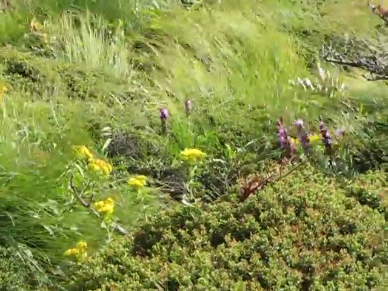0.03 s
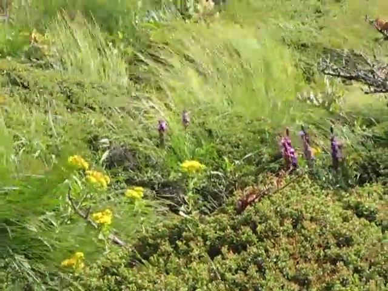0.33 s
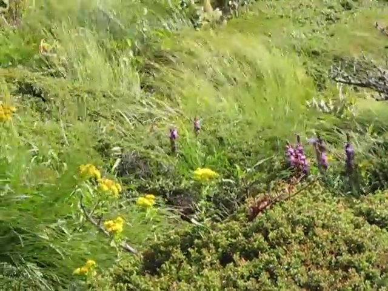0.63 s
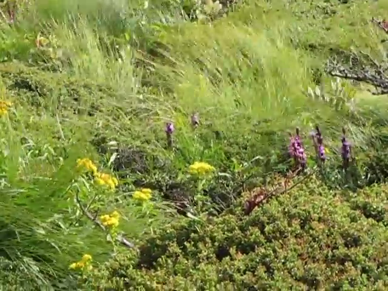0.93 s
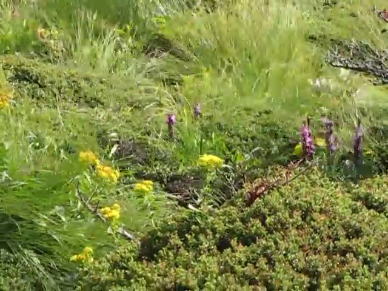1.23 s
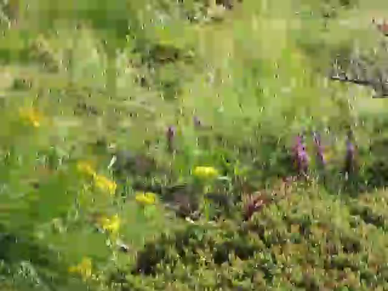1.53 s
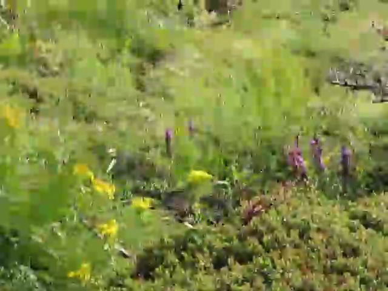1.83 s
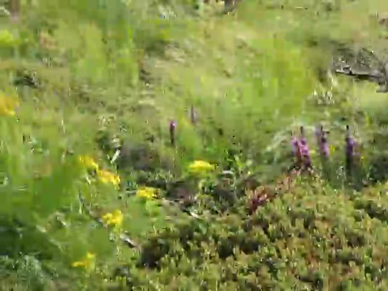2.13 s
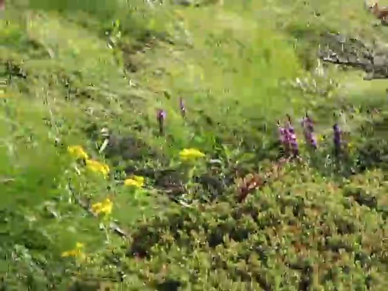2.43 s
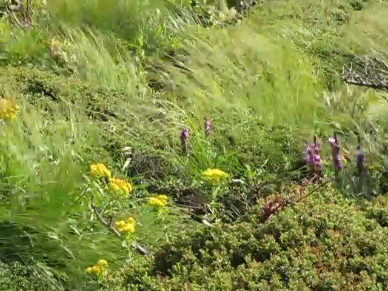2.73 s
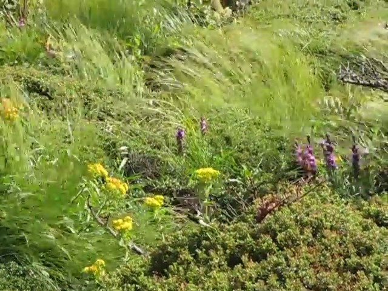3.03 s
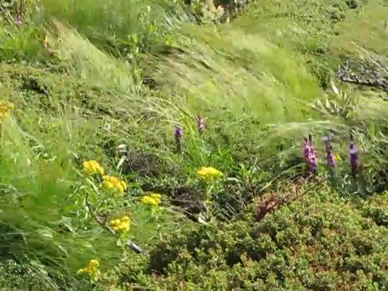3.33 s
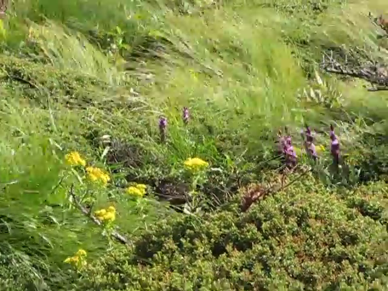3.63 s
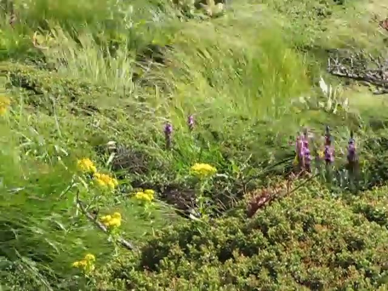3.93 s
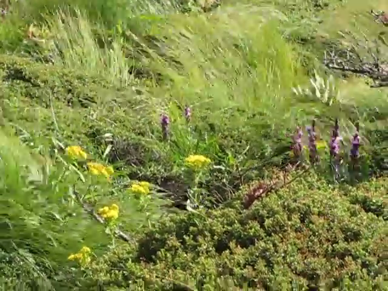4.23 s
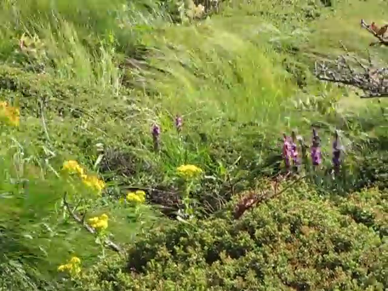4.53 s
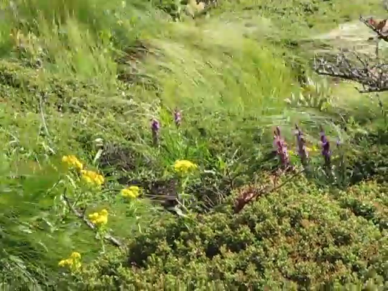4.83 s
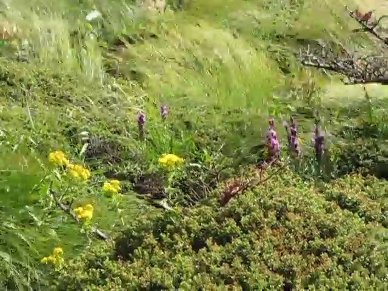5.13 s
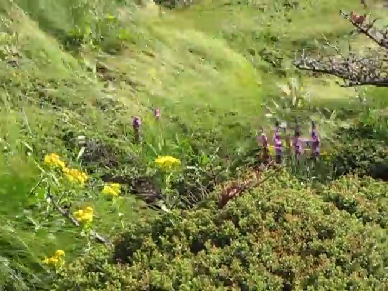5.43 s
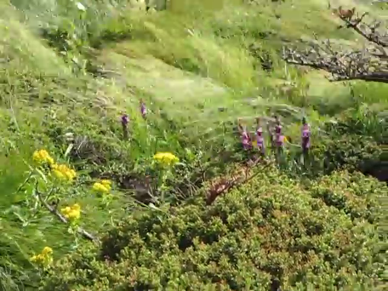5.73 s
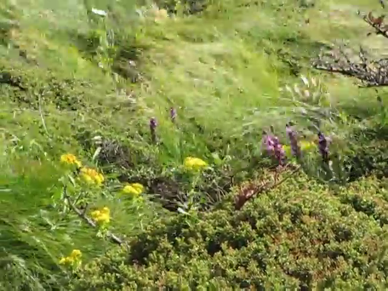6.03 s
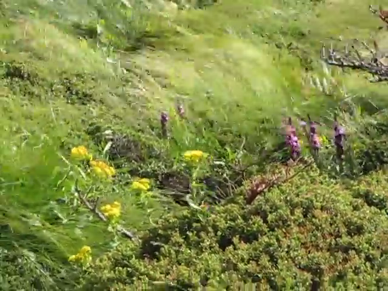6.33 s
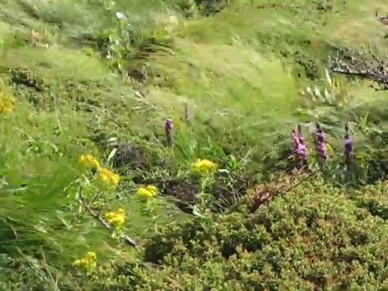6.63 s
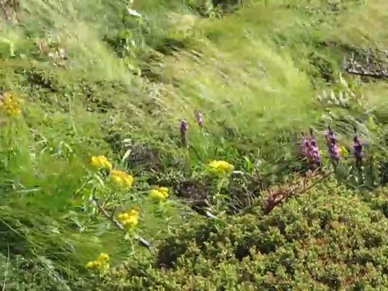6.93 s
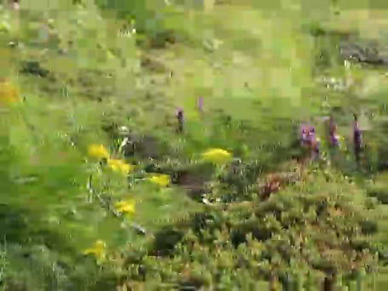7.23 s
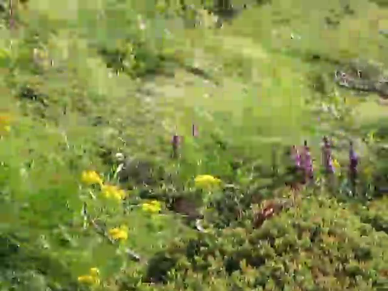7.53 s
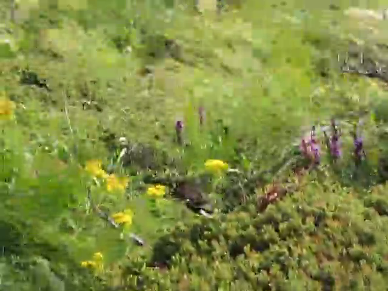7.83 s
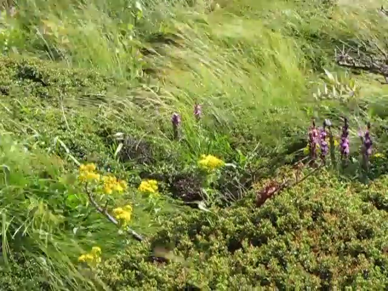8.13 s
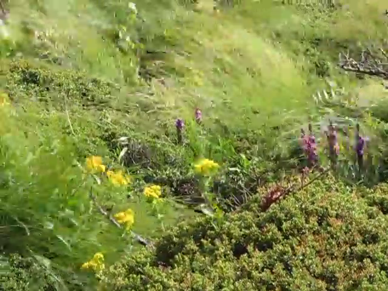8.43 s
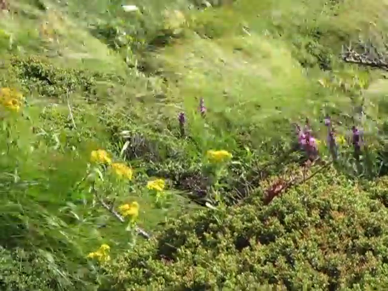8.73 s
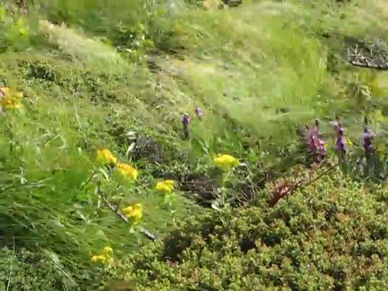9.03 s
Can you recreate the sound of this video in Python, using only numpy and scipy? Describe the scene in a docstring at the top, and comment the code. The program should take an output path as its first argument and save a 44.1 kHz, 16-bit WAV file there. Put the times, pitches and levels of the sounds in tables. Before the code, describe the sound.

Wind buffets a microphone on an open, grassy mountain slope. For the first 1.2 seconds, short gusts make a low, fluttering rumble, with sharp cracks on the left or right. From about 1.3 to 1.9 seconds the wind falls to a lull and a faint hiss of grass comes through. At about 2 seconds it slams back, and gusts swell and drop in quick succession, often leaning to the right. Harder cracks strike near 2.8 seconds and between 4.1 and 4.3. From 4.5 to 6.9 seconds long, heavy gusts overload the microphone, turning the rumble into a brighter, tearing rasp with scattered crackles, strongest around 5 to 6 seconds. The wind eases briefly just after 7 seconds, then surges again from 7.5, rasping hard near 8 and buffeting on until the end at about 9 seconds.

```python
"""On a grassy mountain slope, strong gusts buffet the two microphone openings (ports) of a camera.
Each gust rides on a slower wind: it hits, swells to a crest, eases and drops away. Faster wind makes
the eddies (small swirls of air) at each port stronger and quicker, until they overload the microphone
and the rumble turns into a tearing rasp. Tight eddies slap one port and crack.
In a short lull the hiss of the grass is faintly heard."""
import sys
import numpy as np
from scipy import signal
from scipy.fft import rfft, irfft, next_fast_len
from scipy.io import wavfile

SR = 44100
rng = np.random.default_rng(int(sys.argv[2]) if len(sys.argv) > 2 else 0)


def file_out(sig):
    """Save sig as 16-bit WAV at sys.argv[1]."""
    # one column per channel
    cols = np.atleast_2d(sig).T
    # limit, then scale
    lim = np.clip(cols, -1, 1)
    pcm = np.round(lim * 32767).astype(np.int16)
    wavfile.write(sys.argv[1], SR, pcm)


N = 404397

# The gusts: start_s, length_s, crest_fraction (of the length), crest_db, lean_right_db
GUSTS = [(0.157, 0.16, 0.4, -5, 0.5), (0.318, 0.11, 0.35, -8.5, 6.5), (0.629, 0.11, .6, -2.5, 0),
         (0.741, 0.15, .75, -8, 5.5), (0.928, 0.051, 0.63, -8, 8.5), (1.025, 0.13, .5, -8, 8.5),
         (1.073, 0.048, .5, 1.5, 10.5), (1.877, 0.038, 0.1, -14.5, -10), (1.93, 0.031, 0.6, -8, -2),
         (2.063, .08, .7, 0.5, 2), (2.182, .24, 0.8, 7, 0), (2.412, 0.29, 0.2, 5, 3),
         (3.025, 0.069, 1, 0.5, 10), (3.151, 0.17, 0.65, 3.5, 7.5), (3.324, .45, 0.05, 6.5, 6),
         (3.754, 0.27, 0.6, 4.5, 7), (4.475, 0.64, 0.62, 7.5, 3), (4.987, 0.48, 0.78, 11.5, 1),
         (5.475, 0.609, 0.9, 9.5, 1.5), (6.075, 0.16, 0.35, 2.5, 0), (6.268, 0.68, 0.43, 3, 9.5),
         (6.947, 0.22, 0.1, -10.5, 2.5), (7.33, .17, 0.45, 2, 8.5), (7.502, 0.16, 0.63, 6, 1.5),
         (7.662, 0.46, 0.42, 9.5, 3), (8.112, 0.49, 0.05, 7.5, 8.5), (8.595, 0.23, 0.38, 3, 2.5),
         (8.843, 0.15, 0.22, 2.5, 13)]
# The slower wind under the gusts (the microphone overloads near 0 dB): time_s, pressure_db
BASE_WIND = [(0, -19), (.1, -7.5), (.23, -12), (.48, -11.5), (.56, -10), (1.02, -14.5), (1.14, -10.5),
             (1.27, -16.5), (1.38, -35.5), (1.79, -28), (1.9, -19.5), (2.04, -13), (2.29, -3.5),
             (4.44, -6.5), (6.01, 0), (7.24, -11), (7.53, -1.5), (9.16, -1)]
# How far the wind drifts by chance, least when it is strong: pressure_db, wander_db
WANDER_DEPTH = [(-32.5, 0.9), (-10, 2), (-3.5, 1.24), (1.5, 0.49)]
# The tone of the eddies at a speed factor of 1: pitch_hz, relative_level_db
EDDY_SPECTRUM = [(10, -2), (50, -3), (150, -4), (350, -6), (800, -15), (2000, -31), (6000, -42.5),
                 (20000, -106)]
# Stronger wind sweeps the eddies past faster, so they sound higher: pressure_db, speed_factor
EDDY_SPEED = [(-30, 0.093), (-6.5, 0.7), (2.5, 0.93), (16, 2.03)]
# The air passes the left port faster than the right: left_factor, right_factor
PORT_SPEED = [1.138, 0.83]
# How the ports colour the eddies before any overload: pitch_hz, gain_db
PORT_COLOUR = [(60, 0), (150, 0), (300, 0), (550, -1), (1100, -2.5), (2000, -2.5), (3500, -4), (6000, -7.5),
               (10000, -10.5)]
# How unevenly the wind shoves, most near 0 dB: pressure_db, flutter_factor
FLUTTER_DEPTH = [(-34, 1), (-24, 0.98), (0.5, 1.93), (28, 0.6)]
# Sudden jolts of the wind (the level swings by about 3/4 of the strength): time_s, strength_db
BUFFETS = [(.059, 10.5), (.089, 5), (.490, 1), (.628, 3), (1.052, -4), (1.906, 4), (2.061, 5.5),
           (2.194, 8.5), (2.914, -2.5), (7.251, 3), (7.733, 10), (9.055, 11)]
# Tight eddies that slap one port: time_s, peak_db, port ("L" or "R")
SLAPS = [(.119, -3, "L"), (.167, 5, "L"), (0.192, 3, "L"), (.247, 4, "L"), (0.27, -9, "L"), (.366, 2, "R"),
         (0.388, -6, "L"), (0.69, -1, "R"), (.704, 3.5, "L"), (0.726, 3.5, "R"), (.853, -1, "R"),
         (2.796, 5, "L"), (2.839, 8.5, "R"), (2.961, -3.5, "R"), (4.09, 8.5, "L"), (4.138, 7, "L"),
         (4.163, 10.5, "R"), (4.326, 8, "R")]
# The tone of wind in the grass: pitch_hz, relative_level_db
GRASS_SPECTRUM = [(100, 14.5), (300, 3), (600, 0), (1200, -0.5), (2500, -0.5), (5000, -10.5), (10000, -22),
                  (16000, -28)]
# How alike the grass sounds at the two ports: pitch_hz, likeness (1 is identical)
GRASS_LIKENESS = [(100, .9), (640, 0.93), (1400, .6), (3000, .15), (15000, .1)]
# The grass hiss grows with the wind over the whole slope: time_s, level_db
GRASS_LEVEL = [(0, -52), (1.35, -52), (1.85, -50), (2.6, -50), (7.1, -42), (9.16, -36)]
# How the microphone colours all it hears: pitch_hz, gain_db
MIC_COLOUR = [(40, -3.5), (120, -0.5), (300, -0.5), (1000, -1.77), (2500, -3), (6000, -0.5), (10000, -1.5),
              (16000, -5.5)]


def gust(t, start_s, length_s, crest_fraction, crest_db, lean_right_db):
    """One gust hits, swells to its crest, eases a little and drops away."""
    swell_db, ease_db = 7.5, 3.5
    hit_s, drop_s = 0.014, 0.015
    age = t - start_s
    arch_db = np.interp(age / length_s, [0, crest_fraction, 1], [-swell_db, 0, -ease_db])
    hit, drop = 0.5 + 0.5 * np.tanh([age / hit_s, (length_s - age) / drop_s])
    return hit * drop * at_ports(crest_db + arch_db, lean_right_db)


def wind_strength_db(wander_hz=16.3):
    """The gusts add their power to the slower wind, and the total wanders by chance at each port."""
    t = np.arange(0, N / SR, 0.001)
    base = at_ports(lookup(BASE_WIND, t), lean_right_db=2.5)
    power = base ** 2 + sum(gust(t, *row) ** 2 for row in GUSTS)
    wind_db = np.array([np.interp(np.arange(N) / SR, t, 10 * np.log10(port)) for port in power])
    noise = rng.standard_normal((2, N))
    wander = filtered(noise, lambda hz: hz / wander_hz / (1 + (hz / wander_hz) ** 2) ** 2)
    return wind_db + lookup(WANDER_DEPTH, wind_db) * unit_level(wander)


def wind_rumble(wind_db):
    """The eddies press on the ports as hard as the wind blows, in quick uneven shoves."""
    air = eddies(wind_db)
    shoves_db = 1.98 * flutter() * lookup(FLUTTER_DEPTH, wind_db)
    return air * gain_of(wind_db + buffets_db() + shoves_db)


def eddies(wind_db, frame_size=1024):
    """Swirling air makes a separate noise at each port; its tone slides up as the wind speeds up."""
    hop = frame_size // 4
    frames = np.minimum(np.arange(N // hop + 2) * hop, N - 1)
    hz = np.fft.rfftfreq(frame_size, 1 / SR)
    pressure_db, factor = np.transpose(EDDY_SPEED)
    speed = np.exp(np.interp(wind_db[:, frames], pressure_db, np.log(factor)))
    speed *= np.array(PORT_SPEED)[:, None]
    tone_db = at_pitch(EDDY_SPECTRUM, hz / speed[..., None]) + at_pitch(PORT_COLOUR, hz)
    tone = unit_level(gain_of(tone_db))
    # Give each short frame its own noise in that tone, then join the frames.
    spectra = tone * (rng.standard_normal(tone.shape) + 1j * rng.standard_normal(tone.shape))
    _, air = signal.istft(spectra.swapaxes(1, 2), nperseg=frame_size, noverlap=frame_size - hop)
    return unit_level(air[:, :N])


def flutter(shoves_per_s=150, rise_hz=250, fade_hz=16):
    """Countless small random shoves of air reach each port, quick to rise and slower to fade."""
    chance = shoves_per_s / SR
    kicks = (rng.random((2, N)) < chance) - chance
    shoves = filtered(kicks, lambda hz: 1 / (1 + 1j * hz / rise_hz) ** 2 / (1 + 1j * hz / fade_hz))
    return unit_level(shoves)


def buffets_db(rise_s=0.0012, fade_s=0.01):
    """The air slackens, slams in and eases off; a negative strength swaps the dip and the push."""
    t = np.arange(-SR // 8, SR // 8) / SR
    jolt = np.tanh(t / rise_s) * np.exp(-abs(t) / fade_s)
    return signal.oaconvolve(impulses(BUFFETS), jolt, "same")


def slaps(wind_db, width_s=0.0005, strays_per_s=16, stray_above_wind_db=5.5):
    """A tight eddy is one short push between two dips; a tall one overloads the microphone."""
    u = np.arange(-SR // 200, SR // 200) / SR / width_s
    push = (1 - u ** 2) * np.exp(-u ** 2 / 2)
    listed = np.array([impulses([(time_s, gain_of(db)) for time_s, db, port in SLAPS if port == side])
                       for side in "LR"])
    # Stray slaps come by chance: none below a wind of -15 dB, the full rate from -3.5 dB up.
    per_s = np.interp(wind_db, [-15, -3.5], [0, strays_per_s])
    hits = rng.random((2, N)) < per_s / SR
    strays = hits * rng.choice([-1, 1], (2, N)) * gain_of(wind_db + stray_above_wind_db)
    return signal.oaconvolve(listed + strays, push[None], "same")


def grass_hiss():
    """Wind in the grass makes a soft, even hiss whose low tones are alike at both ports."""
    left, other = rng.standard_normal((2, N))
    likeness = lambda hz: at_pitch(GRASS_LIKENESS, hz)
    right = filtered(left, likeness) + filtered(other, lambda hz: np.sqrt(1 - likeness(hz) ** 2))
    hiss = filtered(np.array([left, right]), lambda hz: gain_of(at_pitch(GRASS_SPECTRUM, hz)))
    level_db = lookup(GRASS_LEVEL, np.arange(N) / SR)
    return gain_of(level_db) * unit_level(hiss)


def at_ports(db, lean_right_db):
    """Pressure at the left and right port when the wind leans to one side."""
    return gain_of(db + np.array([[-0.5], [0.5]]) * lean_right_db)


def gain_of(db):
    """Turns decibels into a number to multiply by."""
    return 10 ** (np.asarray(db) / 20)


def unit_level(x):
    """Scales each row to an average (rms) level of 1."""
    return x / np.sqrt(np.mean(x ** 2, axis=-1, keepdims=True) + 1e-20)


def lookup(table, x):
    """Reads between the rows of a two-column table."""
    return np.interp(x, *np.transpose(table))


def at_pitch(table, hz):
    """Reads between the rows of a pitch table, with octaves evenly spaced."""
    pitch_hz, value = np.transpose(table)
    return np.interp(np.log(hz + 1), np.log(pitch_hz + 1), value)


def filtered(x, response):
    """Multiplies each frequency in x by response(hz)."""
    size = next_fast_len(N + SR // 4, real=True)
    hz = np.fft.rfftfreq(size, 1 / SR)
    return irfft(rfft(x, size) * response(hz), size)[..., :N]


def impulses(rows):
    """Silence with a one-sample spike for each row."""
    spikes = np.zeros(N)
    for time_s, height in rows:
        spikes[round(time_s * SR)] = height
    return spikes


def scene():
    """Rumble, slaps and grass hiss add up at the two ports."""
    wind_db = wind_strength_db()
    return wind_rumble(wind_db) + slaps(wind_db) + grass_hiss()


def record(dry, fizz_db=-8, fizz_hz=3000, low_cut_hz=20, high_cut_hz=15800, output_db=-6.8):
    """The microphone flattens strong peaks, colours the sound and trims the lowest and highest tones."""
    flattened = np.clip(dry, -1, 1)
    # The finest eddies still fizz on the flat tops.
    overload = np.tanh(2 * abs(dry - flattened))
    treble = filtered(dry, lambda hz: hz ** 2 / (hz ** 2 + fizz_hz ** 2))
    fizz = gain_of(fizz_db) * overload * treble
    low_cut = lambda hz: 1j * hz / (1j * hz + low_cut_hz)  # makes the flat tops sag
    coloured = filtered(flattened + fizz, lambda hz: low_cut(hz) * gain_of(at_pitch(MIC_COLOUR, hz)))
    high_cut = signal.firwin(511, high_cut_hz, window=("kaiser", 9), fs=SR)
    return gain_of(output_db) * signal.oaconvolve(coloured, high_cut[None], "same")


dry = scene()
out = record(dry)
file_out(out)
```